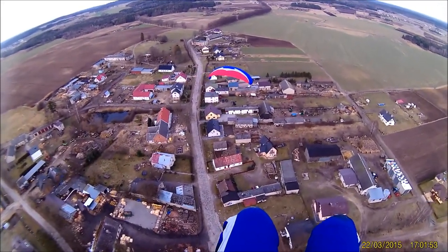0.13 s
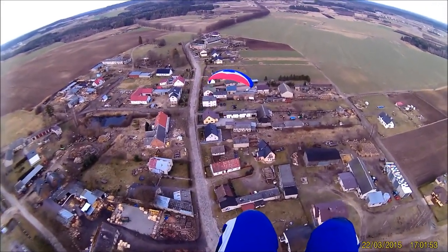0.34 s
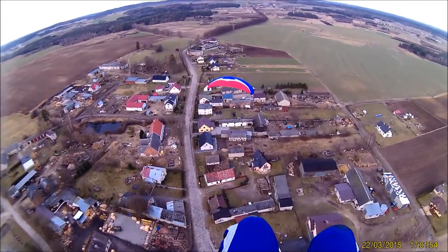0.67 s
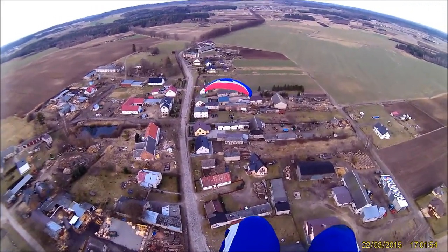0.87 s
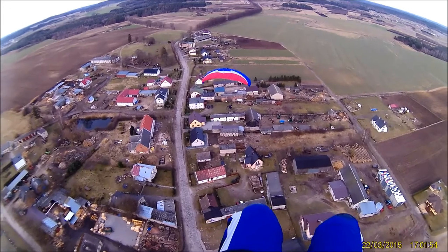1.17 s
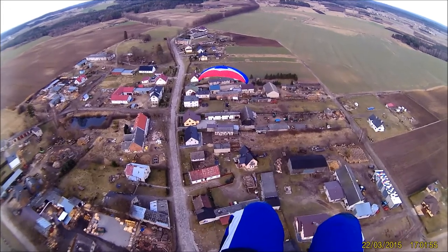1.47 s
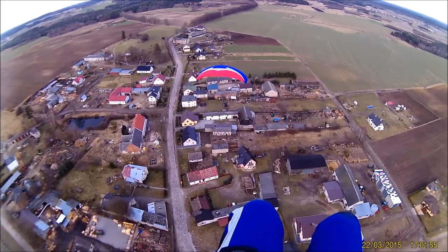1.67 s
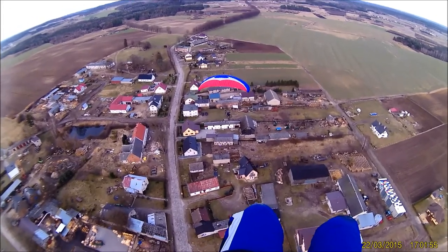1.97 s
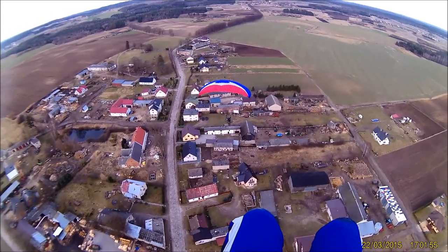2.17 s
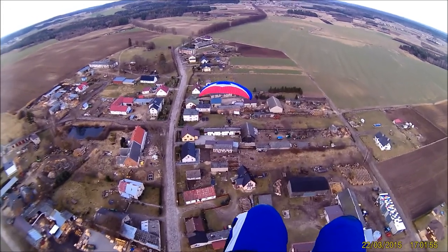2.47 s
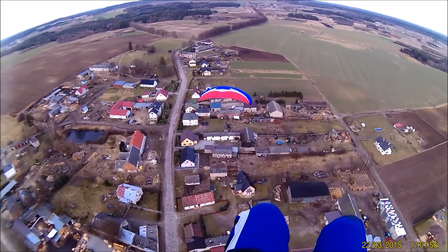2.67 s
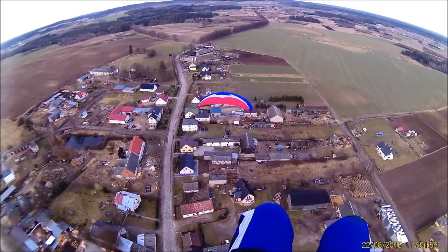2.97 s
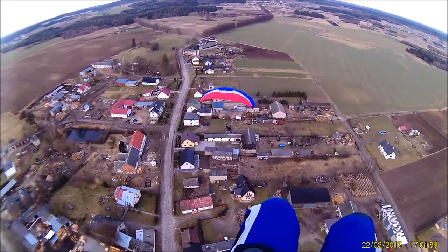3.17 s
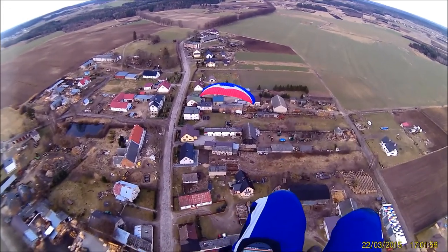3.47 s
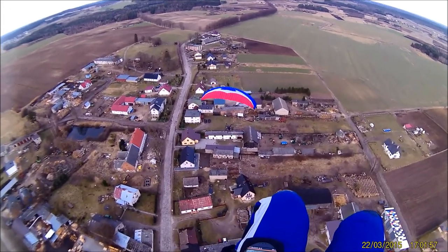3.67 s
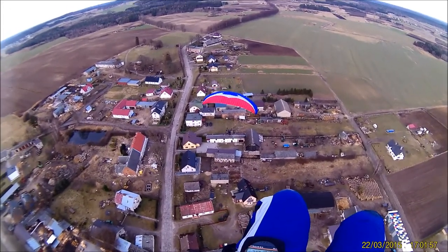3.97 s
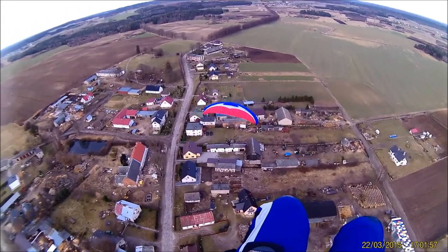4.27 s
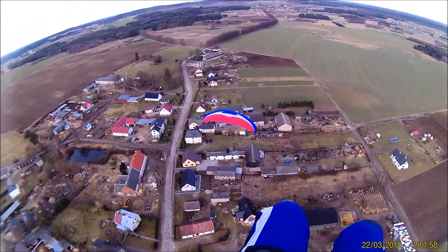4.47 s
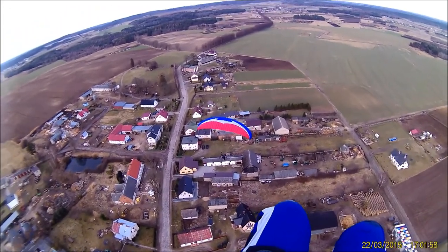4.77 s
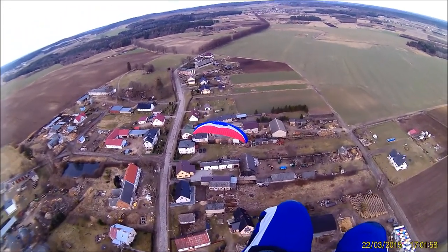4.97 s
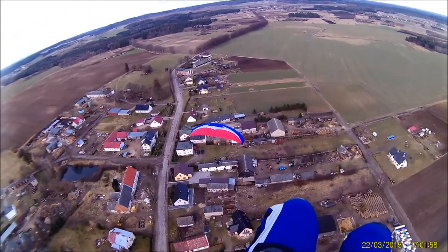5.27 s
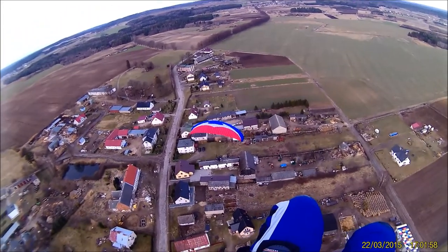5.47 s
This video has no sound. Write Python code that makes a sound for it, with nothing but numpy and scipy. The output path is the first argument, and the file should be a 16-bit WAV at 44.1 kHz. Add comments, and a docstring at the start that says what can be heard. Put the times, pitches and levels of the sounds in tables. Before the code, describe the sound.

A paramotor runs at near-constant speed just behind a small camera in open air. A deep propeller drone near 70 hertz mixes with a higher exhaust hum and rough, rapidly pulsing air roar. Low wind buffeting swells with the pilot's swaying, strongest in the first second. Tiny sharp crackles come from the overloaded microphone. The sound is already running at the start and never stops.

```python
"""A deep, beating propeller drone comes first, close behind a small camera worn by a paramotor pilot in flight.
A two-stroke turns a two-blade propeller through a reduction: blade and exhaust tones are sums of cosines.
Each blade tears through the wake of pilot and frame (noise pulsed twice a blade), with a thin hiss from the tips.
Low noise makes the air buffeting the microphone; peaks past its limit snap, and listed crackles stand out."""
import sys
import numpy as np
from scipy import signal
from scipy.fft import rfft, irfft
from scipy.io import wavfile
from scipy.ndimage import uniform_filter1d

SR = 44100
rng = np.random.default_rng(int(sys.argv[2]) if len(sys.argv) > 2 else 0)


def wrap_up_sound(samples):
    """Save the sound to the file named by the first command line argument, as 16-bit audio."""
    columns = np.atleast_2d(samples).T
    # keep every value between -1 and 1, then stretch to whole-number steps
    tamed = np.clip(columns, -1, 1)
    steps = np.round(tamed * 32767).astype(np.int16)
    wavfile.write(sys.argv[1], SR, steps)


N = 247842
TIME = np.arange(N) / SR  # s

# propeller just behind the pilot, blade rate before its fine jitter: start_s, rate_hz
BLADE_RATE = [(0, 70.16), (0.75, 70.47), (2.9, 69.16), (3.55, 69.86), (4.6, 69.78), (5.1, 70.5),
              (5.62, 70.32)]
# overtones of the blade thump, before swells and shading: multiple_of_blade_rate, level_db
BLADE_OVERTONES = [(2, -24.5), (3, -25.5), (4, -29.5), (5, -24.5), (6, -26), (7, -26.5), (8, -31.5),
                   (9, -37), (10, -51), (11, -30.5), (12, -33), (13, -32.5), (14, -44), (15, -35),
                   (16, -36.5), (18, -31), (19, -31), (20, -41), (22, -29.5), (23, -40.5), (24, -35),
                   (25, -44), (26, -37), (27, -43)]
# overtones shaded by the pilot's body: multiple_of_blade_rate -> share_of_shading
SHADED_OVERTONES = {3: 0.51, 5: 0.84, 11: 0.41, 12: 0.98}
# round exhaust note: start_s, level_db
EXHAUST_NOTE_LEVEL = [(0, -18.5), (2.4, -18), (3.9, -19), (4.65, -24.5), (5.6, -22)]
# overtones of the exhaust rasp, before swells: multiple_of_firing_rate, level_db
EXHAUST_OVERTONES = [(2, -37.4), (3, -35.4), (5, -40.0), (6, -34.2), (7, -40.5), (9, -38.9), (10, -47.4),
                     (13, -41.1), (15, -39.4), (17, -37.2), (18, -49.9)]
# colour of the turbulence on the blades: pitch_hz, relative_db
WASH_COLOUR = [(120, -10.5), (190, -10), (310, -6.5), (440, -3.5), (650, -7), (900, -0.5), (1170, -10.5),
               (1290, -4), (1560, -4.5), (1830, -7.5), (1990, -18.5), (2130, -14.5), (2600, -35),
               (9000, -100)]
# colour of the thin hiss of the blade tips: pitch_hz, relative_db
HISS_COLOUR = [(1500, -21.5), (2800, -3), (3450, -5.5), (3850, 2.5), (4400, -7.5), (5000, -14.5),
               (5900, -9), (7000, -19), (8000, -15.5), (8600, -19), (9500, -25), (10500, -19), (12000, -29),
               (15000, -27)]
# gain of the roar around MID_HZ: start_s, gain_db
MID_ROAR_GAIN = [(0, 2), (1.0, -1), (2.05, 2), (2.8, -1), (3.6, -0.5), (5.6, -0.5)]
# colour of the air buffeting the microphone: pitch_hz, relative_db
BUFFET_COLOUR = [(15, -19.5), (30, -14), (45, -2), (62, 1.5), (90, -2.5), (125, -1), (170, -6), (300, -20),
                 (2000, -92)]
# the pilot sways in the harness about every two seconds: centre_s, half_length_s, strength_0_to_1
SWAYS = [(0.627, 0.47, 1.0), (2.495, 0.26, 0.68), (4.72, 0.25, 0.19)]
# size of the lesser microphone snaps: start_s, gain_db
SNAP_SIZE = [(0, -26.5), (.5, -23), (1.3, -24), (3.5, -26.5), (5.1, -25.5), (5.6, -27)]
# the sharpest crackles of the overloaded microphone: start_s, peak_db before dulling
CRACKLES = [(0.3802, -16), (0.4632, -15), (0.5364, -12.5), (0.9028, -22), (0.9198, -19), (0.9462, -17),
            (1.5344, -25), (1.8782, -16), (2.9575, -16), (3.9613, -17), (4.1899, -20), (4.7344, -18),
            (5.019, -17), (5.1042, -18), (5.147, -19), (5.261, -18)]
# colour of a crackle: pitch_hz, gain_db
CRACKLE_COLOUR = [(600, -9.5), (2600, 24), (4200, 17.5), (6500, 8.5), (10000, 2), (15000, -7)]

FIRINGS_PER_BLADE = 1.373
# every sway turns the microphone into the deep blade tone and away from the upper overtones
DEEP_DB, DEEP_SWAY_DB, DEEP_DB_PER_S = -20, 5.5, -0.44
UPPER_DB, UPPER_SWAY_DB = 0.16, -1
# a stronger sway brings more shading by the pilot's body and more buffeting
SHADE_DB, SHADE_SWAY_DB, SHADE_DB_PER_S = -0.35, -7, 0.5
GUST_DB, GUST_SWAY_DB = -2.5, 4.5
# the blade turbulence slowly grows
TURBULENCE_DB, TURBULENCE_DB_PER_S = -0.28, 0.25
MID_HZ, MID_Q = 880, 2
SNAP_LIMIT = 0.63  # amplitude at the microphone, before the camera's gain
LOUD_SNAP_HZ = 5500  # the sharpest crackles are duller above this
TOP_HZ = 15750  # the camera cuts what lies above


def propeller(blades, deep_db, shade_db, upper_db):
    """A deep tone at the blade rate and a thump whose strength and timing change from blade to blade."""
    deep = np.sqrt(2) * undb(deep_db) * np.cos(2 * np.pi * (blades - 0.47))
    uneven = blades + 0.0038 * per_cycle(blades)

    def placement_db(multiple):
        shading_db = SHADED_OVERTONES.get(multiple, 0) * shade_db
        return shading_db + (multiple > 10) * upper_db

    thump = overtones(uneven, BLADE_OVERTONES, centre=0.47, spread=0.2, wander_db=3.0, gain_db=placement_db)
    return deep + thump * undb(0.57 * per_cycle(blades))


def exhaust(firings, note_db):
    """The silencer leaves a round note at the firing rate and a faint uneven rasp."""
    note = np.sqrt(2) * undb(note_db) * np.cos(2 * np.pi * firings)
    uneven = firings + 0.0037 * per_cycle(firings)
    rasp = overtones(uneven, EXHAUST_OVERTONES, centre=0.313, spread=0.329, wander_db=1.0,
                     gain_db=lambda multiple: 0)
    return note + rasp * undb(0.85 * per_cycle(firings))


def wash(blades, firings, turbulence_db):
    """Each blade hits turbulent air entering and leaving the pilot's wake, harder when it meets an exhaust puff."""
    throb_db = 1.7 * np.cos(2 * np.pi * (firings - blades + 0.7))
    strength = undb(throb_db + turbulence_db + 0.33 * walk(17) + 0.22 * walk(5))

    def strokes(late):
        """Strength of the two hits, late by a share of a blade cycle, over a steady floor."""
        entering = 0.84 * window(blades, 0.27 + late, 0.05) * undb(4.7 * per_cycle(blades))
        leaving = 0.95 * window(blades, 0.642 + late, 0.088) * undb(2.4 * per_cycle(blades))
        return (0.61 + entering + leaving) * strength

    # the low roar comes first, from large eddies at the blade root; the high one follows from the tip
    root = strokes(late=-0.026)
    tip = strokes(late=0.036) * undb(1.6 * turbulence_db)
    below = signal.butter(4, 1120, "low", fs=SR, output="sos")
    above = signal.butter(4, 1120, "high", fs=SR, output="sos")
    low_roar = signal.sosfilt(below, root * rng.standard_normal(N))
    high_roar = signal.sosfilt(above, tip * rng.standard_normal(N))
    roar = colour(low_roar + high_roar, WASH_COLOUR)
    hiss = colour((3.6 + tip) * rng.standard_normal(N), HISS_COLOUR)
    return level(roar, -17.0) + level(housing(hiss, hz=1500, echo=0.21), -47.0)


def airflow(gust_db):
    """Low buffeting at the microphone that swells with the gusts."""
    buffeting = colour(rng.standard_normal(N), BUFFET_COLOUR) * undb(1.5 * walk(7.4))
    return undb(gust_db) * level(buffeting, -24.0)


def crackles(sound, limit, size_db):
    """Peaks past the microphone's limit snap, the taller the louder; listed duller snaps stand out."""
    tops, _ = signal.find_peaks(np.abs(sound), height=limit)
    excess = np.abs(sound[tops]) - limit
    snap_gain = undb(size_db + 2 * rng.standard_normal(N))[tops]
    snaps, loud = np.zeros((2, N))
    snaps[tops] = -np.sign(sound[tops]) * np.sqrt(excess) * snap_gain
    colour_peak = np.abs(colour(np.ones(1), CRACKLE_COLOUR)).max()
    for start_s, peak_db in CRACKLES:
        loud[int(start_s * SR)] += undb(peak_db) / colour_peak
    loud = signal.sosfilt(signal.butter(1, LOUD_SNAP_HZ, fs=SR, output="sos"), loud)
    return colour(snaps + loud, CRACKLE_COLOUR)


def housing(x, hz, echo):
    """A short echo inside the camera case ripples the treble at multiples of hz."""
    return x + echo * np.interp(TIME - 1 / hz, TIME, x)


def overload(x, knee):
    """Above a knee the microphone gives way, so the tallest peaks rasp."""
    excess = x - np.clip(x, -knee, knee)
    return x - excess + (1 - knee) * np.tanh(excess / (1 - knee))


def swaying():
    """Each sway swells and returns smoothly: its course (0-1), and the same weighted by strength."""
    turn, lean = 0, 0
    for centre_s, half_s, strength in SWAYS:
        bump = np.exp(-0.5 * ((TIME - centre_s) / half_s) ** 2)
        turn = turn + bump
        lean = lean + bump * strength
    return turn, lean


def overtones(turns, table, centre, spread, wander_db, gain_db):
    """A repeating thump; shifting reflections delay each overtone (in cycles) and the higher ones swell and fade."""
    out, lag, last = 0, 0, 0
    for multiple, level_db in table:
        lag += (multiple - last) * (centre + spread * rng.uniform(-0.989, 1))
        last = multiple
        swell_db = wander_db * min(multiple / 12, 1) * walk(2.5)
        gain = undb(level_db + swell_db + gain_db(multiple))
        out = out + gain * np.cos(2 * np.pi * (multiple * turns - lag))
    return np.sqrt(2) * out


def per_cycle(turns):
    """One random value for each cycle, joined by straight lines."""
    values = rng.standard_normal(N // 100)
    return np.interp(turns, np.arange(len(values)), values)


def window(turns, centre, width):
    """A smooth bump once a cycle; centre and width are shares of the cycle."""
    offset = (turns - centre + 0.5) % 1 - 0.5
    return np.exp(-0.5 * (offset / width) ** 2)


def walk(rate):
    """Random levels held 1 / rate s and smoothed twice; spread near 1."""
    hold = max(int(SR / rate), 2)
    steps = np.repeat(rng.standard_normal(N // hold + 2), hold)
    return 1.31 * uniform_filter1d(uniform_filter1d(steps, hold), hold)[:N]


def colour(x, points):
    """Causal filter with a (pitch_hz, gain_db) response, built from the cepstrum."""
    size = 4096
    hz, db = np.transpose(points)
    grid = np.maximum(np.fft.rfftfreq(size, 1 / SR), 1)
    gain = undb(np.interp(np.log(grid), np.log(hz), db))
    cepstrum = irfft(np.log(gain))
    # folding the cepstrum forward gives minimum phase
    cepstrum[1:size // 2] *= 2
    cepstrum[size // 2 + 1:] = 0
    impulse = irfft(np.exp(rfft(cepstrum)))
    return signal.fftconvolve(x, impulse)[:N]


def lift(x, hz, q, db):
    """Raise or lower one band by a level that moves."""
    band = signal.lfilter(*signal.iirpeak(hz, q, fs=SR), x)
    return x + (undb(db) - 1) * band


def level(x, db):
    """Scale to an rms level."""
    return x * undb(db) / np.sqrt(np.mean(x ** 2))


def undb(db):
    """Decibels to gain."""
    return 10 ** (np.asarray(db) / 20)


def curve(table):
    """Join the points of a (start_s, value) table by straight lines."""
    return np.interp(TIME, *np.transpose(table))


def scene():
    """Propeller and engine turn together, locked by the reduction; the pilot's sway shifts their balance."""
    turn, lean = swaying()
    deep_db = DEEP_DB + DEEP_SWAY_DB * turn + DEEP_DB_PER_S * TIME
    upper_db = UPPER_DB + UPPER_SWAY_DB * turn
    shade_db = SHADE_DB + SHADE_SWAY_DB * lean + SHADE_DB_PER_S * TIME
    gust_db = GUST_DB + GUST_SWAY_DB * lean
    turbulence_db = TURBULENCE_DB + TURBULENCE_DB_PER_S * TIME

    # running counts of blade passes and firings
    blades = np.cumsum(curve(BLADE_RATE) * (1 + 0.00117 * walk(12))) / SR
    firings = FIRINGS_PER_BLADE * blades

    tones = propeller(blades, deep_db, shade_db, upper_db) + exhaust(firings, curve(EXHAUST_NOTE_LEVEL))
    machine = tones + wash(blades, firings, turbulence_db)
    sound = lift(machine, MID_HZ, MID_Q, curve(MID_ROAR_GAIN)) + airflow(gust_db)
    return (sound + crackles(sound, SNAP_LIMIT, curve(SNAP_SIZE)))[None]


def record(dry):
    """The camera flattens the peaks and cuts the top."""
    wet = overload(undb(0.41) * dry, knee=0.9)
    return signal.sosfilt(signal.ellip(8, 0.2, 70, TOP_HZ, fs=SR, output="sos"), wet)


dry = scene()
out = record(dry)
wrap_up_sound(out)
```